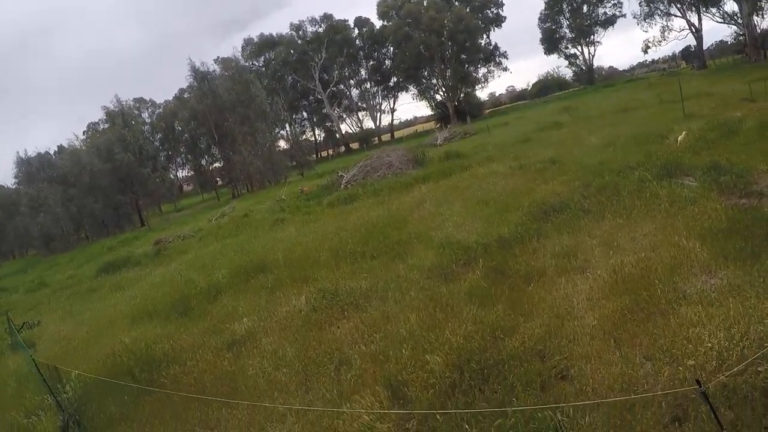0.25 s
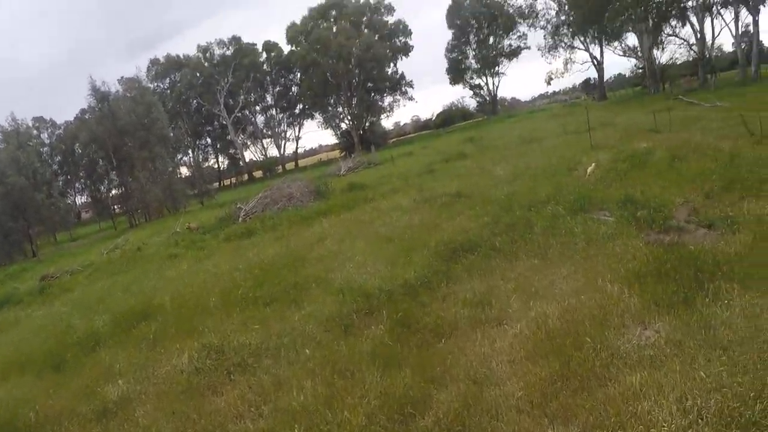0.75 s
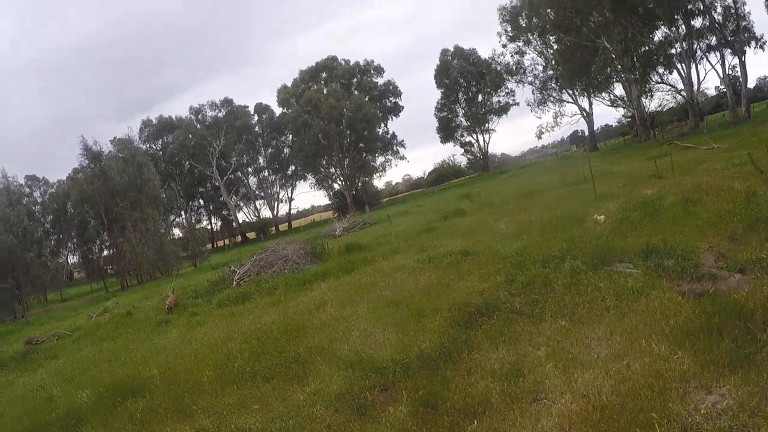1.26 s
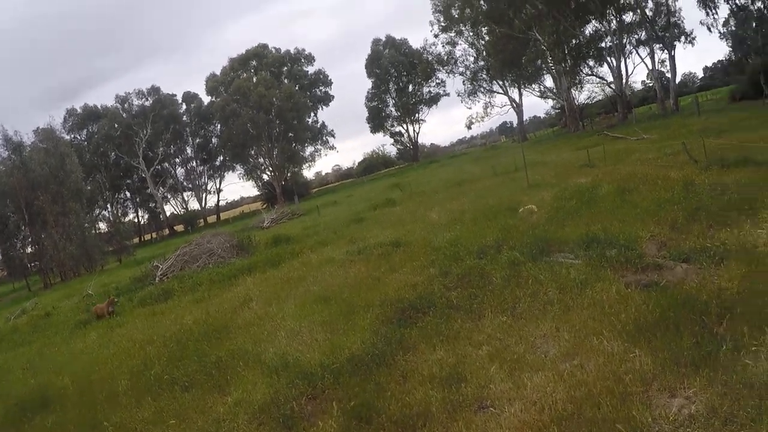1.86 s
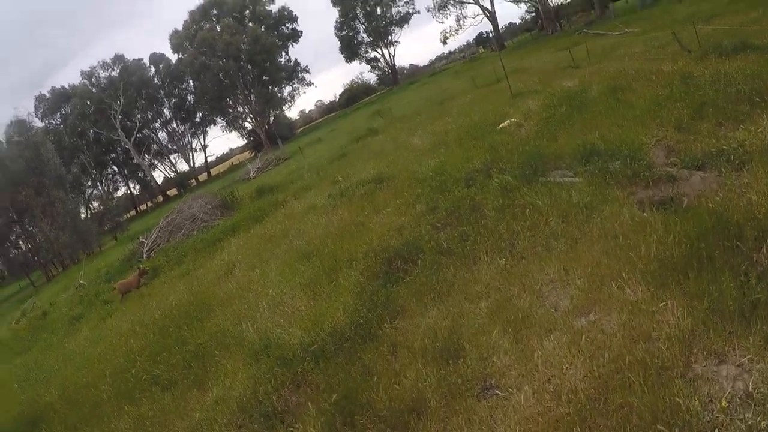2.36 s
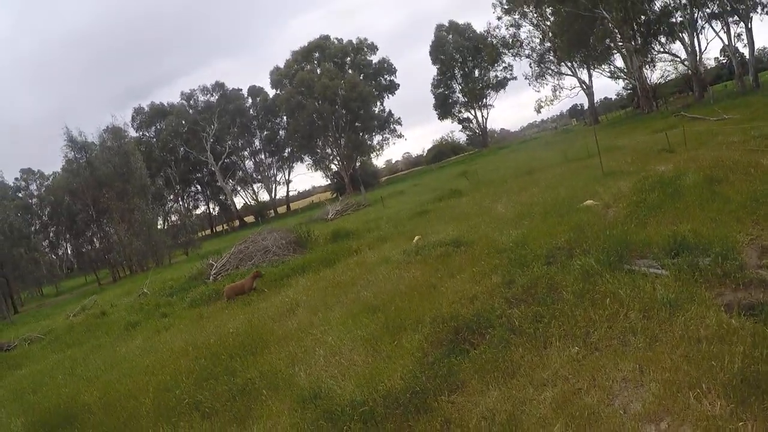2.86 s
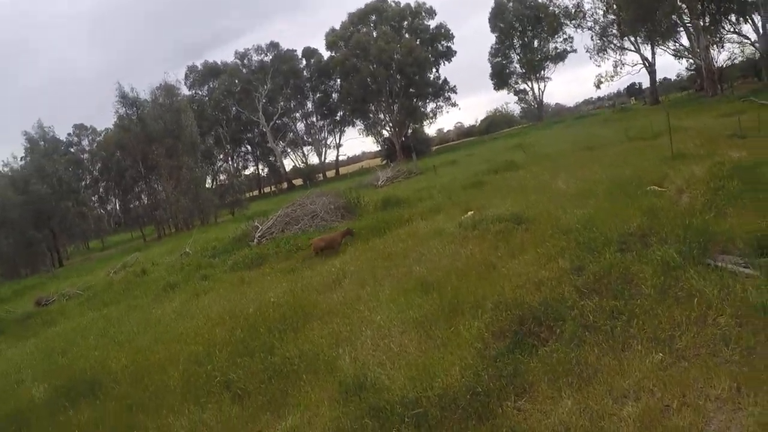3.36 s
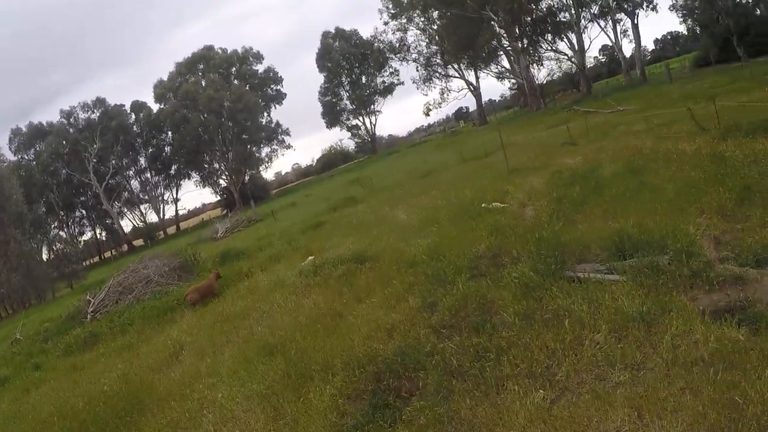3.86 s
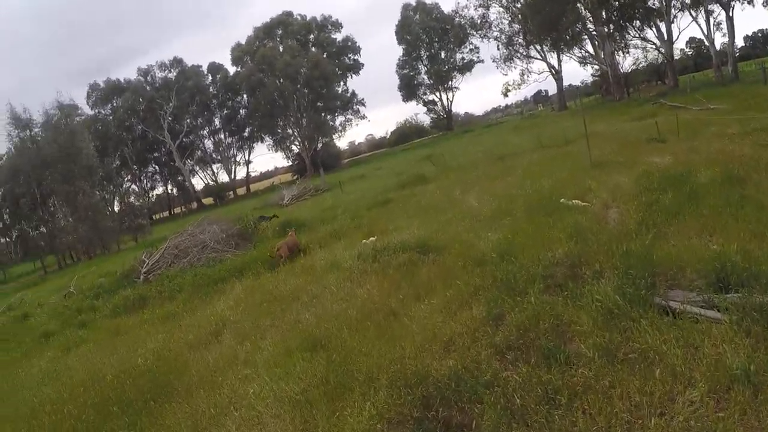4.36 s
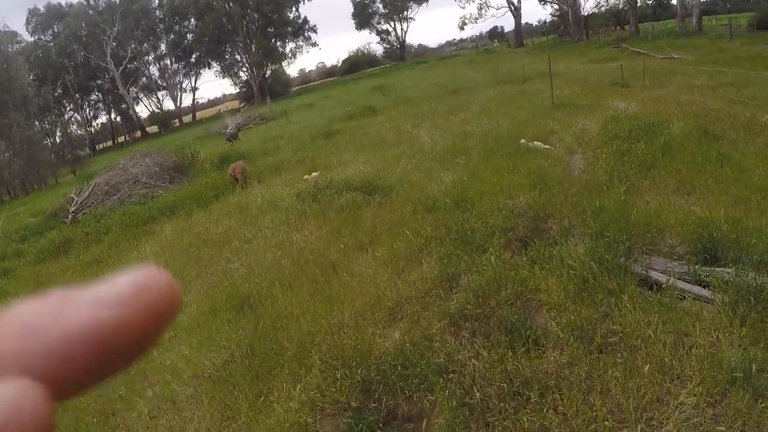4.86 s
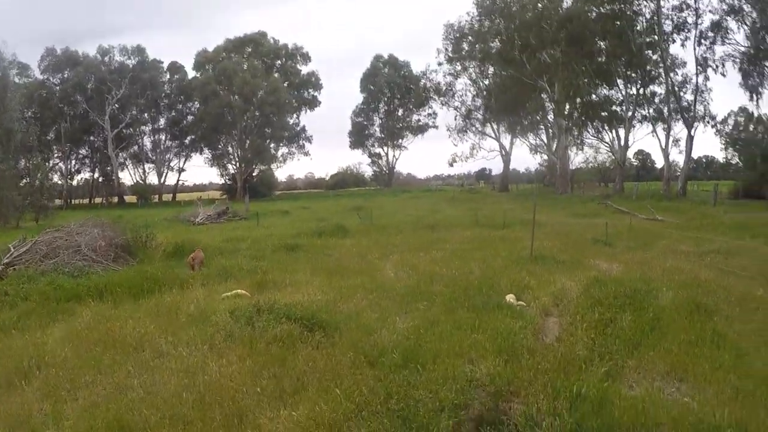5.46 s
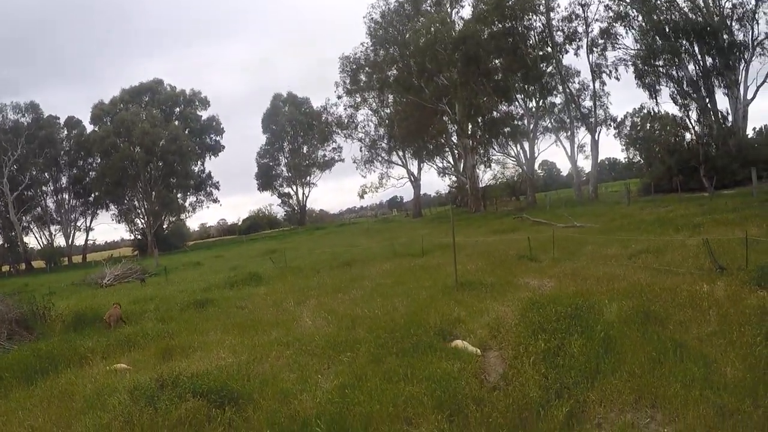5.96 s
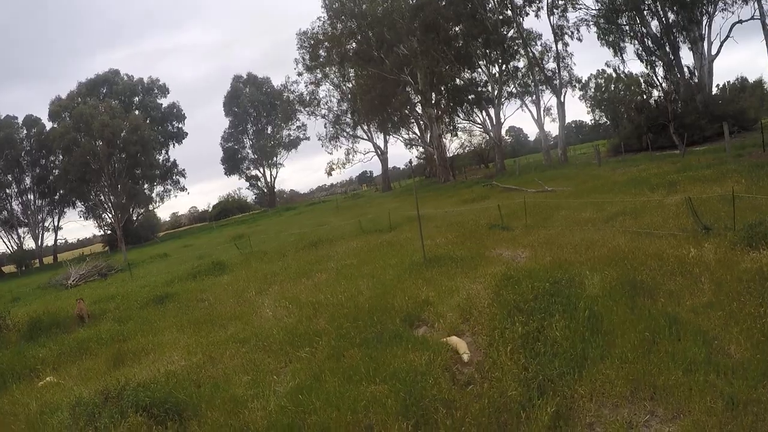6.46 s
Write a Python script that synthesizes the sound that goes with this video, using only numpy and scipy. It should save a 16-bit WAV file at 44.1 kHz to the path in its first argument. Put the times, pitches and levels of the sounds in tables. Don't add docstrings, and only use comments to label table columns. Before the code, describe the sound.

The microphone sits sealed in a plastic case on a walker's body in an open paddock, so everything is boxy, close and dry. Low lumpy wind and a faint distant grass hiss continue throughout. From 0 to 2 seconds there are mostly soft deep jolts, a stronger one near 1.0, and faint cloth brushes. At 2.1 a heavy thump lands, then loud hard plastic knocks at 2.24, 2.37 and 2.48 with short rubs between. It quiets until about 3.25, when a thud and several clacks come, then more knocks and rustles from 3.85 to 4.1. A deep jolt at 4.6 and a knock at 4.7 precede the loudest clipped crack at 5.0. Fingers then rub and scrape grittily, with bright fizz at 5.05 to 5.2, rising wind, another knock and heavy thump around 5.65, fading after 5.9. A last low thump comes at 6.46.

```python
import sys
import numpy as np
from scipy import signal
from scipy.fft import rfft, irfft, next_fast_len
from scipy.io import wavfile
from scipy.ndimage import uniform_filter1d, map_coordinates

SR = 44100
rng = np.random.default_rng(int(sys.argv[2]) if len(sys.argv) > 2 else 0)


def master_out(mix):
    frames = np.transpose(np.atleast_2d(mix))
    ceiling = np.clip(frames, -1, 1)
    pcm = np.round(ceiling * 32767).astype(np.int16)
    wavfile.write(sys.argv[1], SR, pcm)


def linear_from_db(decibels):
    return 10 ** (np.asarray(decibels, float) / 20)


N = 296173

# (time [s], strength [dB])
WIND_STRENGTH = [(0.0, -37.5), (0.37, -47), (1.35, -51.5), (1.89, -46), (2.17, -39), (2.43, -45.5),
                 (2.77, -50), (2.99, -49.5), (3.27, -42), (3.93, -39.5), (4.13, -45), (4.98, -45),
                 (5.2, -31), (5.37, -36.5), (5.48, -35), (6.1, -46), (6.47, -41), (6.72, -47)]
# (frequency [Hz], density [dB])
BUFFET_SPECTRUM = [(26, -15), (45, 3), (52, -11), (59, -4), (113, -12.5), (200, -27.5), (260, -54.5),
                   (440, -120)]
# (frequency [Hz], density [dB])
RUMBLE_SPECTRUM = [(65, 0.5), (110, -5.5), (226, 0.5), (426, -17.5), (534, -21), (700, -32), (910, -59.5),
                   (1540, -120)]
BUFFET_DB, RUMBLE_DB = 4.5, -6.5
RUMBLE_GROWS = 0.98

# (frequency [Hz], density [dB])
FIELD_SPECTRUM = [(260, -15.5), (450, -3.5), (530, -5.5), (1200, -4), (1990, -11), (2650, -7),
                  (7820, -19.5), (15400, -23)]
# (frequency [Hz], level [dB])
ELECTRONIC_WHINE = [(8629, -77.5)]
FIELD_DB = -62.5

# (time [s], peak level [dB])
BODY_JOLTS = [(0.39, -24), (0.48, -24), (0.56, -24.5), (0.75, -32), (1.045, -13.5), (1.15, -22),
              (1.38, -27), (1.47, -30), (1.59, -29), (1.71, -32), (2.101, -6.5), (2.259, -17.5),
              (2.37, -26), (2.86, -29.5), (3.2, -24.5), (3.265, -11), (3.68, -32.5), (3.935, -13),
              (4.085, -21), (4.379, -33), (4.596, -11), (4.68, -25.5), (5.04, -20.5), (5.135, -13),
              (5.22, -26), (5.32, -10.5), (5.675, -6.5), (5.82, -17.5), (6.462, -12.5), (6.6, -30.5)]
JOLT_RISE_S, JOLT_FALL_S, JOLT_SHAPE = 0.065, 0.078, 1.7
IDLE_DB, IDLE_SWING_DB = -38, 3.5

# (start [s], end [s], level [dB], change to the end [dB], belly [dB])
CLOTH_BRUSHES = [(.47, .53, -61.5, 6.5, -1.5), (.635, .685, -57.5, -14, -8),
                 (1.145, 1.17, -58.5, 0.5, -0.5), (1.234, 1.29, -51, -13.5, -2),
                 (2.05, 2.15, -67, 5.5, 2.5), (2.16, 2.23, -53.5, 5, -1.5), (2.255, 2.282, -35.5, -8.5, -3),
                 (2.29, 2.34, -56.5, -12.5, -2.5), (2.38, 2.423, -44, -4, -10.5), (2.5, 2.521, -54.5, 2, 0),
                 (2.522, 2.567, -44, -8.5, -10), (2.575, 2.665, -56.5, 2, -10),
                 (2.782, 2.84, -59, -7.5, -2), (3.268, 3.343, -60.5, -7, 3.5),
                 (3.37, 3.382, -41, -10.5, -2.5), (3.396, 3.417, -44.5, -13, -4),
                 (3.863, 3.923, -52.5, -22, 2), (3.97, 3.985, -55, -3, -1.5), (4.0, 4.022, -48, 4, -9.5),
                 (4.022, 4.055, -38, 2, -7), (4.083, 4.118, -37.5, -18, -4.5), (4.72, 4.741, -57, -17, 5.5)]
# (start [s], end [s], level [dB], change to the end [dB], belly [dB])
FINGER_GRIPS = [(5.014, 5.035, -42, -6, -11.5), (5.056, 5.124, -39.5, 9.5, -9.5),
                (5.13, 5.225, -42.5, 1, -1), (5.225, 5.325, -38.5, 5, 2), (5.325, 5.43, -32.5, -6, 0.5),
                (5.43, 5.47, -49.5, -3, -3), (5.472, 5.52, -41.5, 4, -2), (5.52, 5.635, -36, -8.5, -3),
                (5.65, 5.83, -30, -7.5, -9), (5.83, 5.902, -41, -0.5, -10), (5.948, 5.993, -38.5, -2, -8.5),
                (5.995, 6.1, -56.5, -11, 0.5), (6.1, 6.175, -64.5, 13.5, 0),
                (6.175, 6.28, -51.5, -15.5, -0.5), (6.28, 6.61, -59, 4, 1), (6.68, 6.72, -66, 7, 1)]
# (centre [Hz], width [Hz], level [dB])
SHELL_PEAKS = [(1221, 170, 5.5), (1510, 300, 3.5), (2353, 247, 6), (2397, 166.5, -7.5), (3153, 190, -8.5),
               (4130, 740, -9.5), (4370, 70, -13.5)]
# (centre [Hz], width [Hz], level [dB])
BELLY_PEAKS = [(324, 200, -4), (496, 270, -4), (797, 250, -2)]
# (centre [Hz], width [Hz], level [dB])
FLANK_PEAKS = [(1925, 180, 2.5), (2900, 860, -6), (5200, 820, -32)]
# (centre [Hz], width [Hz], level [dB])
SKIN_PEAKS = [(3220, 1900, 0)]
BRUSH_FLANK_DB, GRIP_FLANK_DB, SKIN_DB = -11, -10, -10
FLANK_PER_BELLY = -0.6
RUB_ATTACK_S, RUB_RELEASE_S = 0.008, 0.012
FIRM_DB, TOP_PER_DB, TOP_FROM_HZ = -48, 0.5, 2900

# (time [s], peak level [dB], weight [dB], brightness [dB])
BUCKLE_KNOCKS = [(2.24, 3, -21.5, -9.5), (2.365, -1.5, -35.5, -8), (2.481, -9, -35, -6.5),
                 (2.721, -53, 0.5, -16), (3.255, -14.5, -22.5, -20), (3.36, -9, -21, -12.5),
                 (3.389, -17, -29, -11), (3.461, -43.5, -22.5, -9), (3.475, -50, -16, -6),
                 (3.851, -15, -21, -14.5), (3.937, -16, -28, -9), (3.961, -20.5, -27.5, -25),
                 (4.072, -5.5, -34.5, -5), (4.71, -18, -18, -17), (5.002, 8.5, -23, -4.5),
                 (5.024, -19.5, -22, -10), (5.081, -21.5, -14.5, -12), (5.084, -14.5, -39, -5.5),
                 (5.516, -20.5, -20, -4), (5.532, -22.5, -23, -4.5), (5.641, -3, -34, -12)]
# (frequency [Hz], level [dB], t60 [s])
THUD_MODES = [(128, 7.5, 0.029), (178, 3.5, .025), (224.5, 3, 0.029), (284.8, 8, 0.023),
              (374.4, -17.5, 0.044)]
# (frequency [Hz], level [dB], t60 [s])
LOW_SHELL_MODES = [(522.6, -1.5, 0.03), (694, -1, 0.022), (754, 2, 0.023), (836, -6, 0.033)]
# (frequency [Hz], level [dB], t60 [s])
MID_SHELL_MODES = [(1348, 5.5, 0.011), (1480, -7.5, .018)]
# (frequency [Hz], level [dB], t60 [s])
HIGH_SHELL_MODES = [(1851, -12, 0.024), (2362, 1, 0.013), (2534, -10.5, 0.019), (3070, -15.5, 0.022)]
# (frequency [Hz], level [dB], t60 [s])
EDGE_MODES = [(3230, -3, 0.0062), (3764, -0.5, .011), (3950, -3, 0.013), (4410, -7.5, 0.0067)]
# (centre [Hz], width [Hz], level [dB])
TICK_PEAKS = [(7000, 5800, 0)]
LOW_PER_WEIGHT, EDGE_PER_BRIGHT = 0.64, 1.8
TICK_DB, TICK_GROWS, TICK_T60_S = -36.5, 1.6, 0.0067

# (start [s], end [s], level [dB], change to the end [dB])
PORT_SCRAPES = [
    (5.055, 5.116, -29, -2.5),
    (5.127, 5.164, -47, -10.5),
    (5.169, 5.201, -46.5, -11.5),
    (5.23, 5.42, -62.5, 6),
    (5.476, 5.518, -55, 5),
    (5.522, 5.61, -51, -16),
    (5.636, 5.663, -39.5, 1.5),
    (5.66, 5.85, -48.5, -32),
]
# (frequency [Hz], density [dB])
FIZZ_SPECTRUM = [(800, -12), (1500, -12), (4200, -9.5), (4750, -5.5), (5400, -11), (9800, -13),
                 (12600, -11), (15400, -22.5)]
SCRAPE_ATTACK_S, SCRAPE_RELEASE_S = 0.0028, 0.01

TOP_HZ = 15330


def unit(x):
    return x / np.sqrt(np.mean(x ** 2) + 1e-20)


def wobble(rate):
    knots = rng.standard_normal(int(N * rate / SR) + 4)
    return map_coordinates(knots, [np.arange(N) * rate / SR])


def filtered(x, response):
    m = next_fast_len(N + 8192)
    return irfft(rfft(x, m) * response(np.fft.rfftfreq(m, 1 / SR)), m)[:N]


def lowpassed(x, corner_hz, order):
    return filtered(x, lambda hz: 1 / (1 + (hz / corner_hz) ** order))


def coloured(x, spectrum):
    f, db = np.transpose(spectrum)
    return unit(filtered(x, lambda hz: linear_from_db(np.interp(np.log(hz + 1), np.log(f + 1), db))))


def resonant(x, peaks):
    def bank(hz):
        total = 0
        for k, (centre, width, db) in enumerate(peaks):
            damping = 1j * hz * width
            total = total + (-1) ** k * linear_from_db(db) * damping / (centre * centre - hz * hz + damping)
        return total
    return unit(filtered(x, bank))


def grit(grain_db, rate):
    return unit(linear_from_db(grain_db * wobble(rate)) * rng.standard_normal(N))


def patchy(x, depth_db):
    z = signal.stft(x, nperseg=256)[2]
    patches = uniform_filter1d(rng.standard_normal(z.shape), 4, 0)
    patches = uniform_filter1d(patches, 16, 1)
    return unit(signal.istft(z * linear_from_db(depth_db * unit(patches)), nperseg=256)[1][:N])


def swells(s, db, rise, fall, shape):
    t = np.arange(0, N / SR + 0.001, 0.001)
    late = t - s[:, None]
    away = np.where(late < 0, -late / rise, late / fall)
    power = linear_from_db(2 * (db[:, None] - 20 * away ** shape))
    return np.interp(np.arange(N) / SR, t, np.sqrt(power.sum(0)))


def strokes(s, end, db, change_db, attack, release):
    t = np.arange(0, N / SR + 0.001, 0.001)
    late, length = t - s[:, None], np.abs(end - s)[:, None]
    hold_db = db[:, None] + change_db[:, None] * np.clip(late / length, 0, 1)
    ends_db = 20 * (np.clip(-late, 0, None) / attack + np.clip(late - length, 0, None) / release)
    return np.interp(np.arange(N) / SR, t, linear_from_db((hold_db - ends_db).max(0)))


def wind():
    s, db = np.transpose(WIND_STRENGTH)
    strength_db = np.interp(np.arange(N) / SR, s, db)
    mean_db = strength_db.mean()
    rumble_db = mean_db + RUMBLE_GROWS * (strength_db - mean_db)
    gust = wobble(3.1)
    buffet = coloured(rng.standard_normal(N), BUFFET_SPECTRUM)
    buffet = unit(linear_from_db(0.37 * gust) * buffet)
    rumble = coloured(rng.standard_normal(N), RUMBLE_SPECTRUM)
    rumble = unit(linear_from_db(0.8 * gust + 1.6 * wobble(19)) * rumble)
    return linear_from_db(strength_db + BUFFET_DB) * buffet + linear_from_db(rumble_db + RUMBLE_DB) * rumble


def field():
    hiss = coloured(patchy(rng.standard_normal(N), depth_db=2.1), FIELD_SPECTRUM)
    (hz, db), = ELECTRONIC_WHINE
    whine = linear_from_db(db + 5.5) * np.sin(2 * np.pi * hz * np.arange(N) / SR)
    return linear_from_db(FIELD_DB + 0.6 * wobble(2.8)) * hiss + whine


def sway():
    level = swells(*np.transpose(BODY_JOLTS), JOLT_RISE_S, JOLT_FALL_S, JOLT_SHAPE)
    swing_hz = 28 * (1 + 0.07 * wobble(12) + 0.06 * wobble(30))
    phase = 2 * np.pi * np.cumsum(swing_hz) / SR
    overtone = 0.14 * wobble(14) * np.sin(2 * phase)
    heave = resonant(rng.standard_normal(N), [(30, 25, 0)])
    heave = unit(lowpassed(heave, 50, 4))
    idle = linear_from_db(IDLE_DB + IDLE_SWING_DB * wobble(5)) * heave
    return level * linear_from_db(-2) * (np.sin(phase) + overtone + 0.17 * heave) + idle


def rubbing():
    friction = patchy(grit(grain_db=2.2, rate=320), depth_db=1.7)
    shell = unit(lowpassed(resonant(friction, SHELL_PEAKS), 4600, 8))
    belly = resonant(friction, BELLY_PEAKS)
    flank = resonant(friction, FLANK_PEAKS)
    skin = unit(lowpassed(resonant(friction, SKIN_PEAKS), 5500, 4))
    out = np.zeros(N)
    for rows, body, flank_db, trade in [(CLOTH_BRUSHES, shell, BRUSH_FLANK_DB, 0),
                                        (FINGER_GRIPS, shell + linear_from_db(SKIN_DB) * skin, GRIP_FLANK_DB, FLANK_PER_BELLY)]:
        s, end, db, change_db, belly_db = np.transpose(rows)

        def gain(share_db):
            return strokes(s, end, db + share_db, change_db, RUB_ATTACK_S, RUB_RELEASE_S)

        low = lowpassed(body, TOP_FROM_HZ, 8)
        top_db = TOP_PER_DB * np.minimum(db + change_db / 2 - FIRM_DB, 0)
        out += gain(0) * low + gain(top_db) * (body - low)
        out += gain(belly_db) * belly
        out += gain(flank_db + trade * belly_db) * flank
    return out


def contact(hz):
    def dead(centre, width):
        gap = centre ** 2 - hz ** 2
        return (gap + 0.2j * hz * width) / (gap + 1j * hz * width)
    dull = 1 / (1 + 1j * hz / 5000 - (hz / 4300) ** 2)
    return dull * dead(990, 320) * dead(4650, 2100)


def knocks():
    out, ticks = np.zeros(N + SR), np.zeros(N + SR)
    t = np.arange(SR // 8) / SR
    families = [THUD_MODES, LOW_SHELL_MODES, MID_SHELL_MODES, HIGH_SHELL_MODES, EDGE_MODES]
    rebound = np.sin(2 * np.pi * 33 * t) * linear_from_db(-60 * t / 0.098) * (1 - np.exp(-t / 0.003))
    for s, db, weight_db, bright_db in BUCKLE_KNOCKS:
        start = round((s + 0.0004) * SR)
        span = slice(start, start + len(t))
        out[span] += linear_from_db(db + weight_db + 8) * rebound
        tick_db = TICK_GROWS * db + TICK_DB - 60 * t / TICK_T60_S
        ticks[span] += linear_from_db(tick_db) * rng.standard_normal(len(t))
        shares = [weight_db + 15.5, LOW_PER_WEIGHT * weight_db + 6.5, -2,
                  bright_db + 4, EDGE_PER_BRIGHT * bright_db - 0.3]
        for modes, share_db in zip(families, shares):
            for hz, mode_db, t60 in modes:
                rise = 1 - np.exp(-t / (0.00061 + 0.5 / hz))
                tone = np.sin(2 * np.pi * hz * (1 + 0.012 * rng.standard_normal()) * t)
                ring_db = db + share_db + mode_db + rng.standard_normal() - 60 * t / t60
                out[span] -= linear_from_db(ring_db) * rise * tone
    ticks = ticks[:N]
    return filtered(out[:N], contact) + np.std(ticks) * resonant(ticks, TICK_PEAKS)


def scrape():
    level = strokes(*np.transpose(PORT_SCRAPES), SCRAPE_ATTACK_S, SCRAPE_RELEASE_S)
    friction = patchy(grit(grain_db=1.8, rate=170), depth_db=2.0)
    return level * linear_from_db(0.8) * coloured(friction, FIZZ_SPECTRUM)


def scene():
    return (wind() + field() + sway() + rubbing() + knocks() + scrape())[None]


def thinned_top(x):
    hz, _, z = signal.stft(x, SR, nperseg=1024)
    bass = np.log(np.sum(np.abs(z[:3]) ** 2, 0) + 1e-12)
    surplus = bass - uniform_filter1d(bass, size=60)
    busy = surplus + 0.8 * rng.standard_normal(len(bass)) > 0.6
    top = hz > 12900
    quiet = np.mean(np.abs(z[top]), 0) < linear_from_db(-100)
    block = rng.random((len(hz) // 12 + 1, len(bass))) < 0.62
    block = np.repeat(block, 12, 0)[:len(hz)]
    z = z * np.where(block & busy & quiet & top[:, None], linear_from_db(-23), 1)
    return signal.istft(z, SR, nperseg=1024)[1][:N]


def roll_off(x):
    return signal.sosfilt(signal.butter(12, 16480, fs=SR, output="sos"), x)


def record(dry):
    top, hard = 0.97, 6
    band = filtered(thinned_top(dry[0]), lambda hz: hz < TOP_HZ)[None]
    clipped = band / (1 + np.abs(band / top) ** hard) ** (1 / hard)
    return roll_off(clipped)


dry = scene()
out = record(dry)
master_out(out)
```